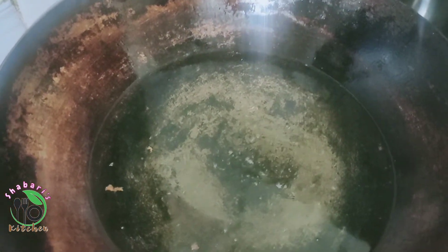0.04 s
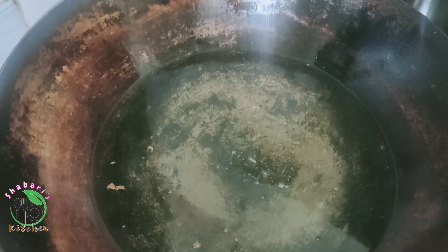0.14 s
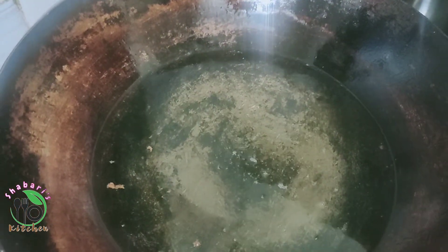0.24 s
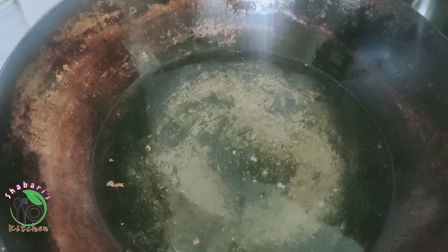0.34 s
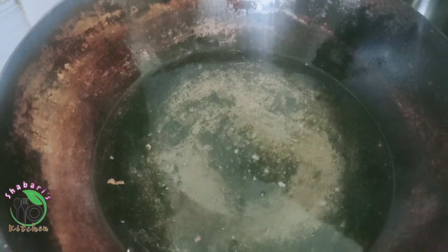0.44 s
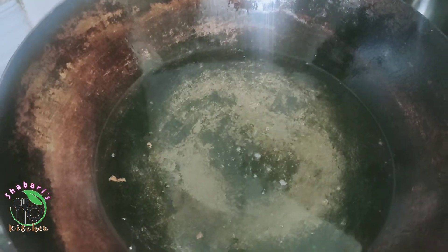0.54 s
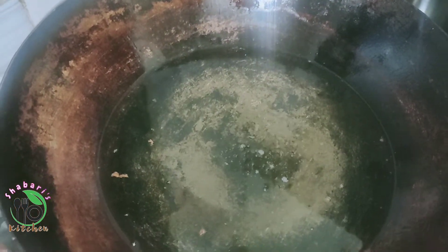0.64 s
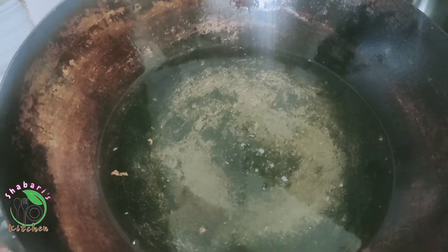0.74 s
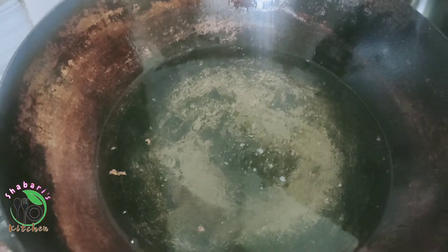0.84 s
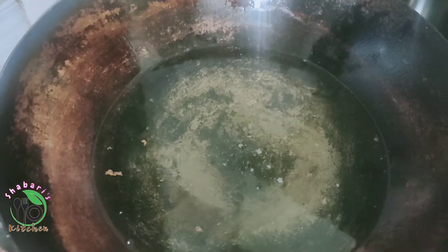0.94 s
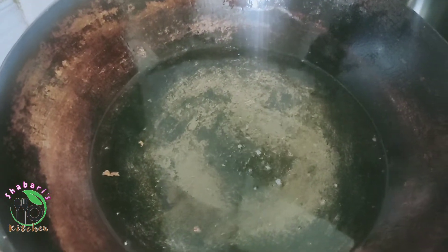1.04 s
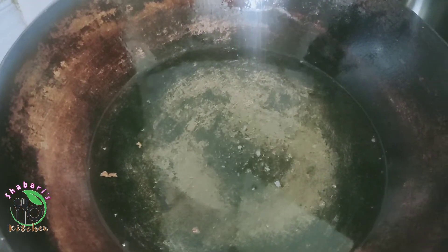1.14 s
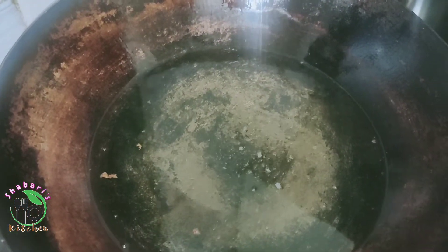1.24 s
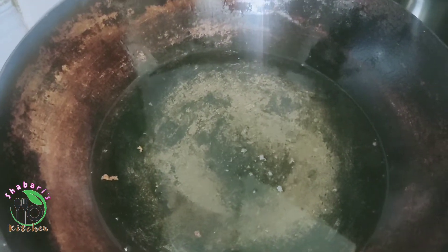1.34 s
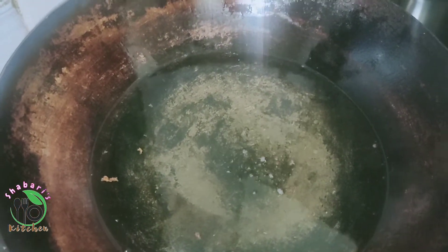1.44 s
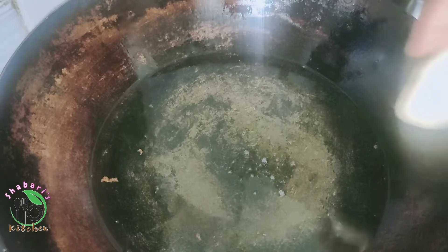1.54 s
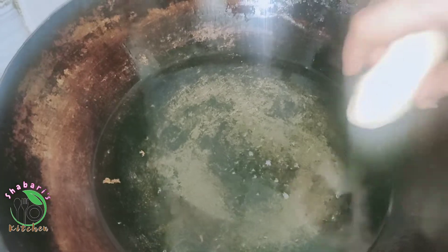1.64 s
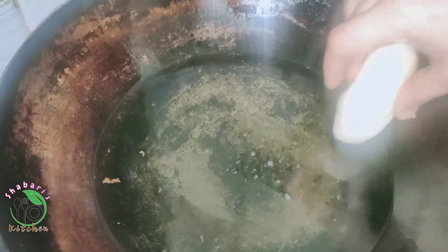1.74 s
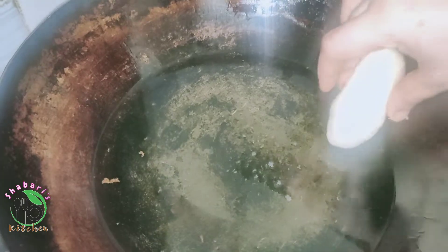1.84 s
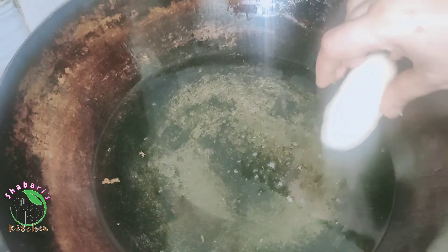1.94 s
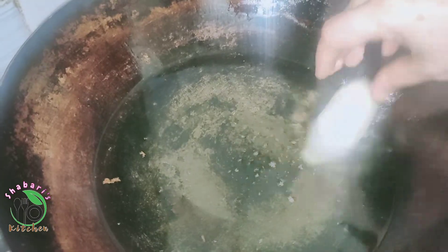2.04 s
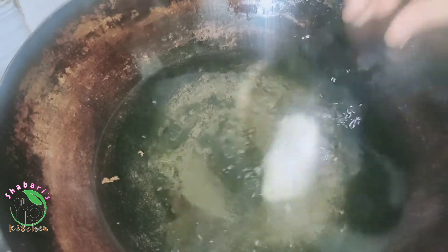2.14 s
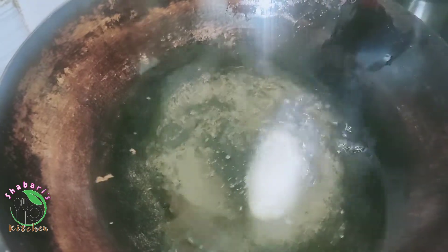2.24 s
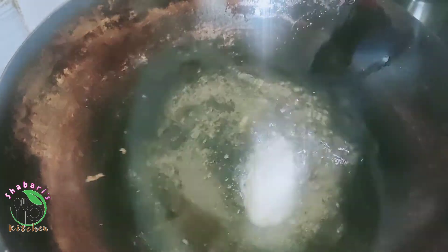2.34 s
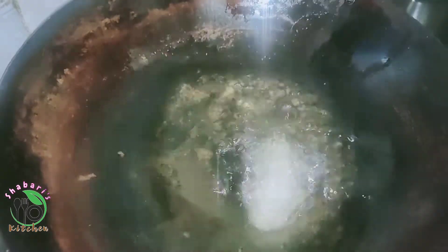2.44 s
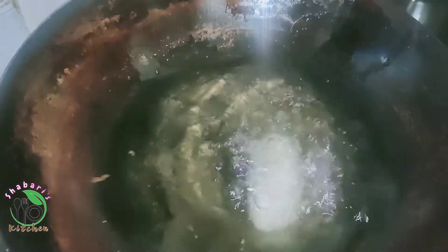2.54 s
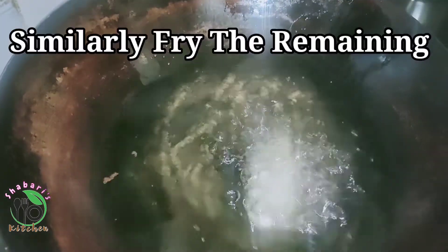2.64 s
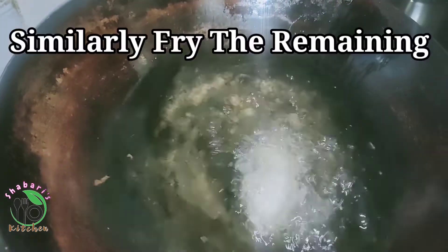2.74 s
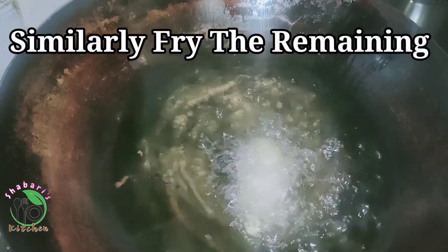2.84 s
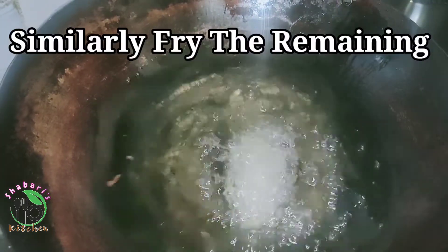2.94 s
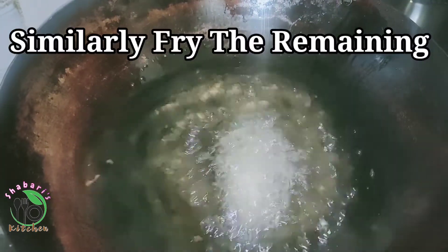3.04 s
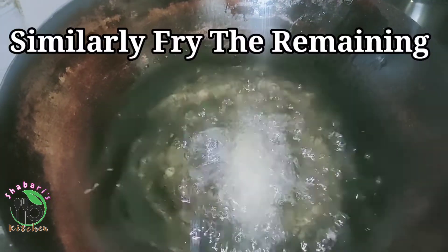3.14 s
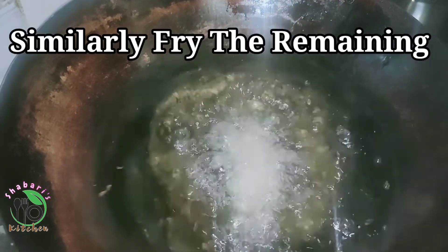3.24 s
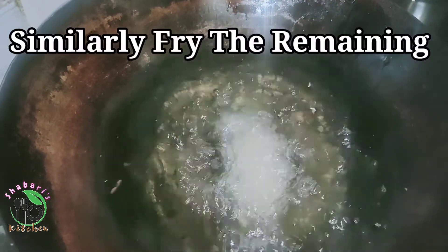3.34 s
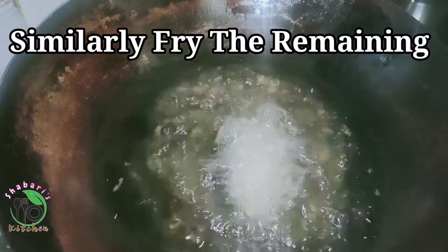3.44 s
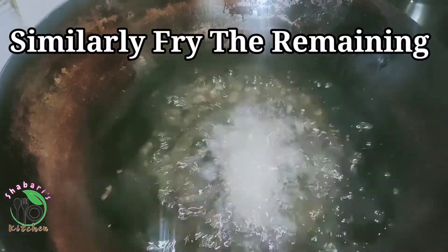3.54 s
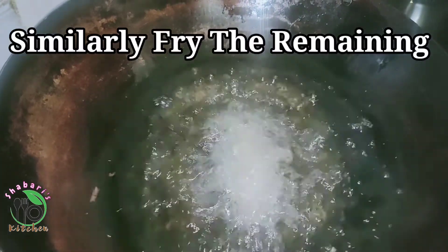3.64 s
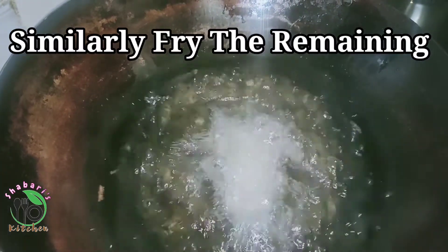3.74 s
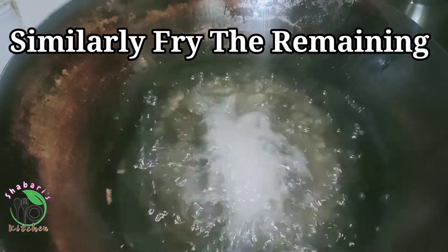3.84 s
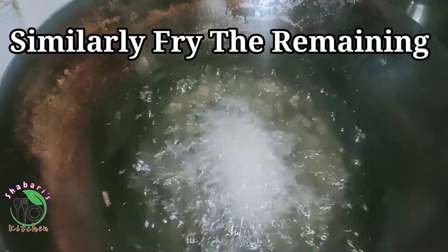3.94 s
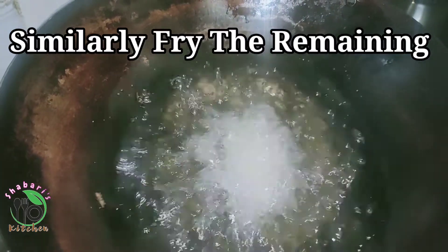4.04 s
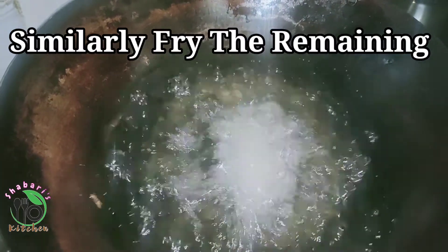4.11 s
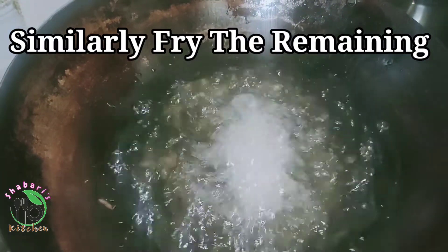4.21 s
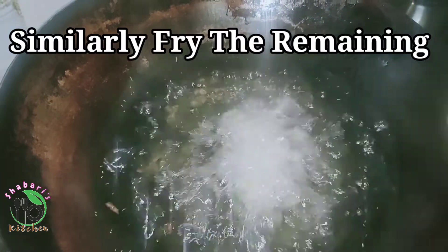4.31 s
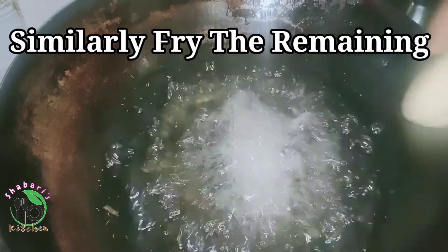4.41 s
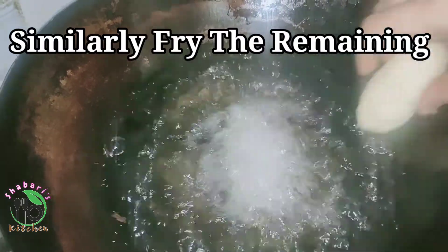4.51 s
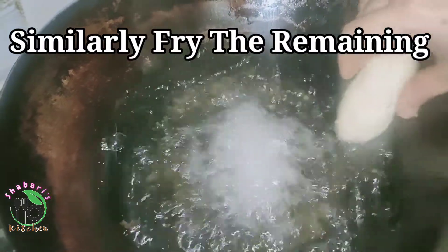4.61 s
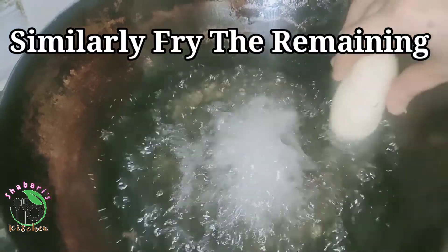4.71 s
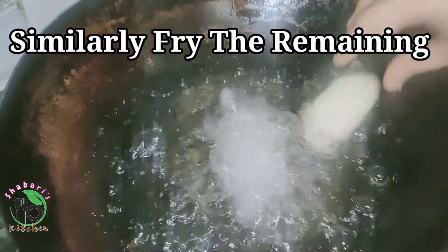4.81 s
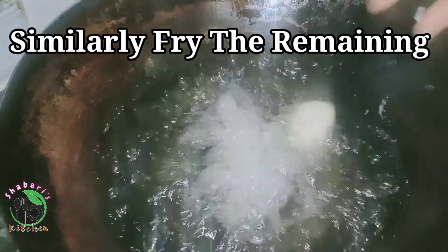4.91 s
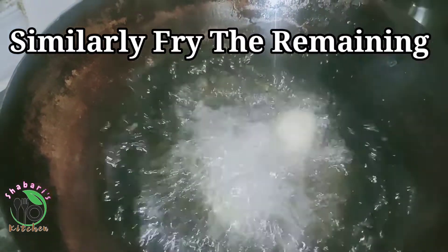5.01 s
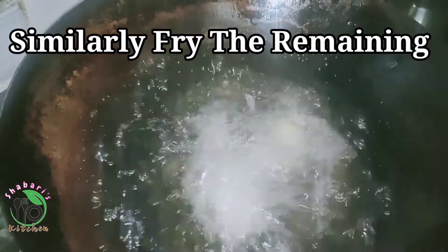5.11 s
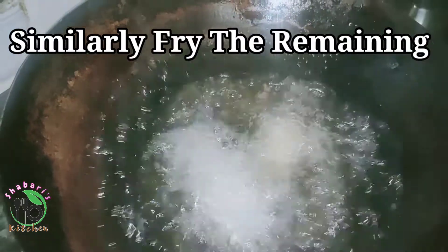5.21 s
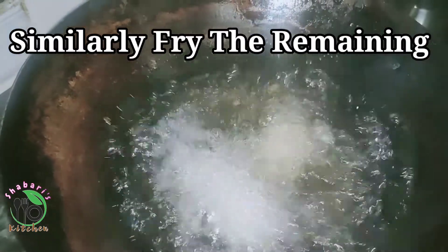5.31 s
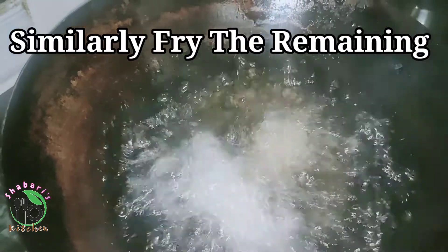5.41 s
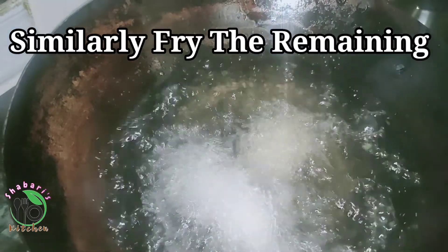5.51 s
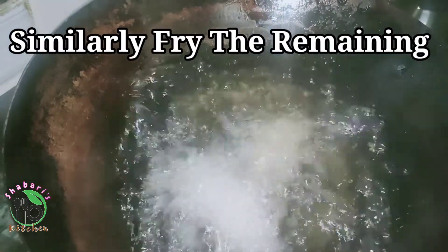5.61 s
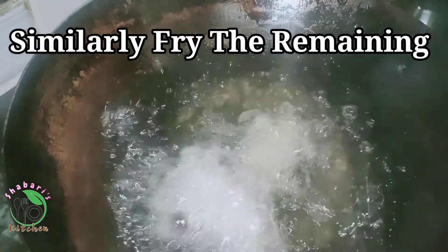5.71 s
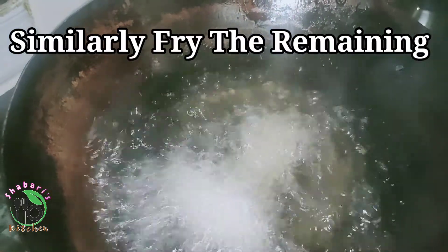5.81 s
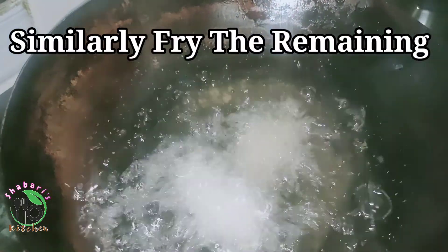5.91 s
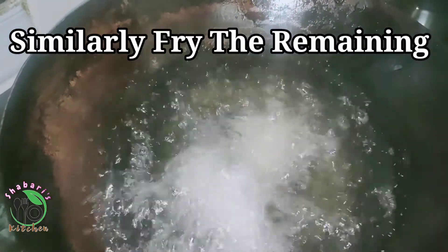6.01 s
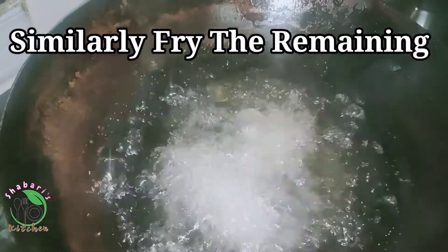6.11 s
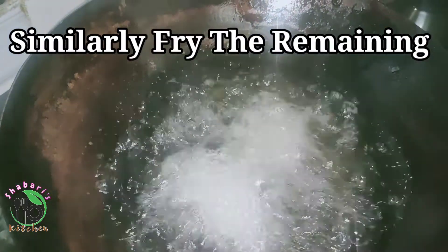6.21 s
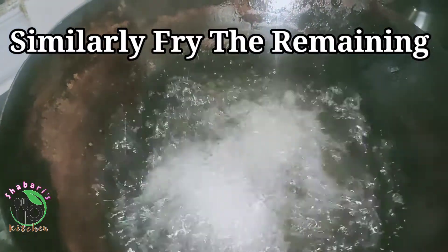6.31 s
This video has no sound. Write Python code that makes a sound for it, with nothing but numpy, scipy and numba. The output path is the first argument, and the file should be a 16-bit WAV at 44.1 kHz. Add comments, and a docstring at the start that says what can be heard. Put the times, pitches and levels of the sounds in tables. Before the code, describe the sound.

In a small hard kitchen, metal ware rattles and is knocked down with a ringing boom, followed by faint oil hiss and a quiet pause. At about three seconds wet food enters hot oil: a bright fizz flares, then gurgling bubbles, crackle, sharp spits and low plops build into a dense boil. Close stereo microphone above the pan, slightly dull on top.

```python
"""A small hard kitchen, heard from just above a pan of hot oil.
Metal ware is knocked and set down as decaying modes and rattle, while the oil hisses faintly with tiny bubbles.
Then wet food slides in: swarms of ringing steam bubbles gurgle, crackle and fizz, single ones stand out as
low plops and higher pips, and drops of water spit with short cracks. A second piece of food adds to the boil.
Dense decaying noise gives the reflections of the pan and the room."""
import sys
import numpy as np
from scipy import signal
from scipy.fft import rfft, irfft, next_fast_len
from scipy.io import wavfile
from numba import njit

SR = 44100
rng = np.random.default_rng(int(sys.argv[2]) if len(sys.argv) > 2 else 0)


def output_pcm(signal):
    """Save a mono or channel-first signal as 16-bit PCM at the path in sys.argv[1].

    Samples are clipped to [-1, 1] before scaling.
    """
    pcm = np.clip(np.atleast_2d(signal).T, -1, 1) * 32767
    wavfile.write(sys.argv[1], SR, np.round(pcm).astype(np.int16))


N = 280476
T = np.arange(N) / SR
DROP_S = 2.946  # the food slides in
ROOM_T60_S = 0.47


def frying():
    """Boiling: water in the food turns to steam, whose bubbles ring at pitches set by their size."""
    # gushes of steam: (time [s], lift of the gurgle [dB], lift of the crackle [dB])
    surges = [(3.17, 4.5, -0.5), (3.27, 0.5, 4.5), (3.49, 3, 6.5), (3.66, 2, 4.5), (4.002, 6, 3.5),
              (4.17, 1.5, 2), (4.33, 5.5, 1.5), (4.61, 2.5, 2), (4.689, 2.5, 4.5), (4.86, 2.5, -1.5),
              (5.009, 2, 2)]
    attack_s, surge_half_length_s, swell_s = 0.0083, 0.034, 0.17
    age = np.maximum(T - DROP_S, 0)
    boil = 1 - np.exp(-(age / attack_s) ** 2)
    # round and deep bubbles take longer to form
    formed = 1 - np.exp(-(age / swell_s) ** 2)
    surge_db, crackle_surge_db = sum(
        np.outer(lifts, np.exp(-((T - s) / surge_half_length_s) ** 2)) for s, *lifts in surges)
    burst_db = 0.73 * walk(55)
    return (gurgle(age, boil, surge_db + burst_db)
            + crackle(age, boil, crackle_surge_db + 0.5 * burst_db)
            + fizz(age, boil)
            + deep_bubbles(boil * formed, 0.5 * burst_db)
            + bloops(age, formed)
            + pings(age, boil))


def gurgle(age, boil, lift_db):
    """Bubble resonance: large steam bubbles ring low, and the lowest pitches fill in last."""
    # colour: (frequency [Hz], level [dB])
    spectrum = [(150, -44.5), (260, -25.5), (297, -6), (339, -19), (410, -4), (465, 1.5), (541, 3),
                (613, -4), (724, -7), (813, -1.5), (876, -4.5), (1250, -7), (1640, -19), (1900, -23),
                (2470, -55), (4180, -120)]
    # the first bubbles are small and grow: (upper edge of the band that fills in [Hz], fill time [s])
    fill = [(800, 0.038), (500, 0.15), (375, 0.25)]
    start_db, growth_db_per_s = -43.5, 3.5
    bubbles = swarm(rate=550, low_hz=322, high_hz=1592, swing=0.82, scatter_db=0.5,
                    pan_db=0.6, spread_db=1.5, wall_db=-9.5)
    bubbles = in_kitchen(bubbles, spectrum, room_db=-2.0)
    # long waves reach both microphones nearly alike
    bubbles = bubbles - 0.67 * below(bubbles - bubbles.mean(0), 800)
    for hz, fill_s in fill:
        bubbles = bubbles - np.exp(-(age / fill_s) ** 2) * below(bubbles, hz)
    return boil * undb(start_db + growth_db_per_s * age + lift_db) * bubbles


def crackle(age, boil, lift_db):
    """Bubble resonance at small size: short higher rings, with a surge as the wet skin first touches the oil."""
    # colour: (frequency [Hz], level [dB])
    spectrum = [(880, -13.5), (1500, -1), (1720, -9), (2090, -2.5), (2540, -8.5), (2880, -3.5), (3460, -8),
                (4500, -8), (5850, -29), (9900, -120)]
    start_db, growth_db_per_s = -55, 3.5
    contact_db, contact_rise_s, contact_t60_s = -45, 0.05, 0.14
    bubbles = swarm(rate=1500, low_hz=1634, high_hz=3960, swing=0.7, scatter_db=4.5,
                    pan_db=5.0, spread_db=2.5, wall_db=-1.0)
    boiling = boil * undb(start_db + growth_db_per_s * age + lift_db)
    contact = undb(contact_db) * flare(DROP_S, contact_rise_s, contact_t60_s)
    # unrelated sounds add in power
    return np.hypot(boiling, contact) * in_kitchen(bubbles, spectrum, room_db=-14.0)


def fizz(age, boil):
    """Flash boiling: surface water turns to the finest, highest bubbles, in flares that die away."""
    # colour: (frequency [Hz], level [dB])
    spectrum = [(2240, 7.5), (3800, -0.5), (5110, 3.5), (6400, -2), (7360, -5.5), (7500, -1.5), (7890, -26),
                (8400, -46.5), (10900, -82), (18500, -120)]
    # flashes of surface water: (start [s], level [dB], t60 [s])
    flashes = [(2.93, -33, 1.9), (3.83, -44, 2.5), (5.717, -36.5, 2.2)]
    start_db, growth_db_per_s, flare_rise_s = -50, -0.2, 0.048
    flares = np.sqrt(sum((undb(db) * flare(s, flare_rise_s, t60)) ** 2 for s, db, t60 in flashes))
    gain = np.hypot(boil * undb(start_db + growth_db_per_s * age), flares)
    bubbles = swarm(rate=2000, low_hz=3590, high_hz=7820, swing=2.14, scatter_db=3.5,
                    pan_db=3.0, spread_db=6.0, wall_db=1)
    bubbles = in_kitchen(bubbles, spectrum, room_db=-22.5)
    # a fierce fizz is made of finer bubbles, so it is brighter
    fierce = np.clip((20 * np.log10(gain + 1e-9) + 48) / 7, 0, 1)
    bright = colour(bubbles, [(4600, -6.5), (7000, 2.0)])
    return gain * ((1 - fierce) * bubbles + fierce * bright)


def deep_bubbles(onset, burst_db):
    """Bubble resonance at the largest size: the lowest rings, coming in heaves."""
    # colour: (frequency [Hz], level [dB])
    spectrum = [(21, -82), (35, -35.5), (89, -12), (118, -18), (152, -6.5), (211, -5), (252, -19.5),
                (296, -2), (334, -11.5), (380, -2.5), (490, -33.5), (840, -120)]
    # level of the deep bubbles, heaving up and down: (time [s], level before the overall lift [dB])
    heaves = [(2.95, -87), (3.09, -62), (3.33, -88), (3.68, -59), (3.82, -93), (4.01, -52), (4.06, -66.5),
              (4.45, -57.5), (4.5, -50), (4.53, -53.5), (4.75, -55.5), (5.25, -53), (5.51, -58.5),
              (5.54, -51), (6.08, -54.5), (6.35, -54.5)]
    lift_db = 3
    bubbles = swarm(rate=200, low_hz=83.0, high_hz=359.5, swing=0.79, scatter_db=-3.0,
                    pan_db=0.0, spread_db=2.5, wall_db=-32.5)
    gain = onset * undb(lift_db + np.interp(T, *np.transpose(heaves)) + burst_db)
    return gain * in_kitchen(bubbles, spectrum, room_db=-12)


def bloops(age, formed):
    """Rising resonance: round, low bubbles chirp upwards as they die away."""
    start_db, growth_db_per_s = -47, -2
    bubbles = swarm(rate=30, low_hz=407, high_hz=571, swing=1.63, scatter_db=-2.0,
                    pan_db=-6.0, spread_db=2.5, wall_db=-12.5, glide=0.03)
    round_bubbles = unit(colour(bubbles, [(200, -20.5), (420, -6)]))
    return formed * undb(start_db + growth_db_per_s * age) * round_bubbles


def pings(age, boil):
    """Lightly damped resonance: while the oil is still open, single bubbles ring out above the boil."""
    start_db, growth_db_per_s = -48, -6.5
    bubbles = swarm(rate=85, low_hz=1307, high_hz=3940, swing=2.6, scatter_db=5.5,
                    pan_db=3.0, spread_db=4.5, wall_db=-3.0, glide=0.015)
    return boil * undb(start_db + growth_db_per_s * age) * unit(bubbles)


def plops():
    """Surface rupture: single bubbles, large and small, ring as low plops and higher pips and break with a snap."""
    # bubbles that stand out: (time of peak [s], relative level [dB], pitch [Hz], cycles to the peak [1])
    bubbles = [(3.167, -28.5, 507.4, 2.4), (3.231, -36, 3160, 5), (3.246, -34, 2290, 6.6),
               (3.2976, -27, 866, 1.01), (3.423, -43, 2270, 5), (3.469, -33.5, 1860, 3),
               (3.485, -26, 3270, 0.87), (3.5134, -29, 1014, 0.44), (3.579, -34.5, 3900, 8.4),
               (3.623, -18, 1053, 0.78), (3.628, -31, 1320, 2.4), (3.6444, -22.5, 780, 0.9),
               (3.6858, -25, 720, 0.68), (3.693, -37.5, 2440, 5), (3.863, -24, 3360, 0.62),
               (3.973, -24.5, 2650, 0.85), (3.981, -21.5, 770, 0.7), (4.18, -21, 1120, 0.72),
               (4.18, -20.5, 2020, 0.86), (4.3141, -26.5, 805, 0.73), (4.3249, -27, 770, .8),
               (4.381, -24, 816, 0.8), (4.3925, -23, 850, 1.1), (4.4853, -23.5, 2930, 1.6),
               (4.5355, -28.5, 2840, 1.4), (4.559, -29.5, 2230, 2.2), (4.618, -22.5, 720, 0.79),
               (4.6931, -30, 740, 0.72), (4.7494, -29.5, 2430, 1.6), (4.814, -35, 2180, 2.8),
               (4.8434, -23, 735, 0.72), (4.8519, -24.5, 700, 0.75), (4.9919, -20, 1120, 0.43),
               (5.0216, -18.5, 840, 0.61), (5.0817, -23, 633, 1.06), (5.1208, -29, 2480, 2),
               (5.1642, -18, 770, 0.85), (5.2261, -16, 833, 0.78), (5.2665, -20, 890, 0.4),
               (5.2801, -18.5, 960, 0.66), (5.3555, -19, 920, 0.56), (5.443, -25, 2100, 0.87),
               (5.457, -22.5, 598, 1.7), (5.5372, -14, 610, 0.63), (5.5608, -22, 674, 0.78),
               (5.7254, -23, 680, 0.6), (5.7816, -25, 615, 0.87), (5.8492, -17, 770, 0.44),
               (5.9386, -16, 620, 0.65), (5.937, -23.5, 2860, 0.66), (6.0499, -14, 775, 0.69),
               (6.085, -20.5, 774, 0.76), (6.1233, -22.5, 850, 0.8), (6.2047, -14.5, 1030, 0.39),
               (6.224, -19.5, 800, 0.86), (6.2854, -15.5, 760, 0.6), (6.322, -16.5, 720, 0.9)]
    snap_hz, snap_db = 2500, -14.5
    s, db, hz, swing = np.transpose(bubbles)
    body = colour(ring(s, hz, swing, undb(db + 2.0), 0.011), [(40, -17.5), (300, -3.0)])
    snap = ring(s, np.full(len(s), snap_hz), np.full(len(s), 0.5), undb(db + snap_db), 0.011)
    x = body + snap
    pan_wall = undb(-11) * echoes(x, t60=0.06)
    return sides(0.8)[:, None] * (x + pan_wall + undb(-6) * echoes(x, ROOM_T60_S))


def spits():
    """Explosive boiling: water drops burst with a short crack and a lower snap that light up the room."""
    # bursting drops: (time [s], relative level [dB], pitch [Hz], left minus right [dB])
    drops = [(1.07, -39, 7250, -27), (1.087, -37, 7140, -20), (1.094, -39, 7200, -17),
             (1.209, -41.5, 7000, -15), (2.058, -38, 7100, -18), (2.2783, -36, 7000, -10),
             (2.6506, -45, 6030, -21), (2.8078, -38.5, 6760, -13.5), (2.973, -30.5, 5900, 4),
             (3.0191, -19.5, 6300, -3), (3.0436, -20.5, 6700, 1), (3.069, -23, 4540, 22),
             (3.1012, -24, 6750, -10), (3.19, -23.5, 5500, 8), (3.2334, -27, 5550, 13),
             (3.514, -32, 4800, 23), (3.8514, -29, 6600, 3), (3.8628, -23.5, 5600, 9),
             (3.906, -22.5, 5300, 9), (3.971, -19, 5070, 4.5), (4.1125, -29, 5900, -1),
             (4.1373, -28, 5000, 13), (4.1531, -13, 5060, 5.5), (4.2556, -32.5, 5920, 3),
             (4.2903, -28.5, 5900, 2), (4.3754, -34, 6600, -7), (4.497, -10.5, 6660, -3.5),
             (4.5934, -22, 6470, -10), (4.8475, -31.5, 4380, 16), (4.9492, -33.5, 7100, -13),
             (5.7452, -25, 7000, 12), (5.7649, -15, 6800, 4), (5.8455, -19.5, 6420, 7),
             (6.0047, -26.5, 4530, 19)]
    splutter_fade_s, splutter_db = 0.55, 0.5
    s, db, hz, pan_db = np.transpose(drops)
    # just after the food goes in, drops burst in clusters
    wet = (s > DROP_S) * np.exp(-((s - DROP_S) / splutter_fade_s) ** 2)
    gains = sides(pan_db)
    size = undb(db + 4.5) * gains / gains.mean(0)
    swing = np.full(len(s), 1.2)
    crack = np.array([ring(s, hz, swing, (1 - wet / 2) * v, 0.0015) for v in size])
    splutter = np.array([ring(s, hz, swing, wet * v, 0.0015) for v in size])
    snap = ring(s, hz / 2.4, np.full(len(s), 0.25), undb(db - 15.5), 0.003)
    x = crack + undb(splutter_db) * echoes(splutter, t60=0.024) + snap
    # small drops make a larger share of splash, which is heard only off the walls
    splash = ring(s, hz / 1.57, np.full(len(s), 0.35), undb(0.33 * db - 19.5), 0.003)
    return x + undb(-4.5) * echoes(x, t60=0.048) + undb(-7.5) * echoes(x + splash, t60=0.38)


def thumps():
    """Damped low modes: the settling food and the biggest burst of steam thump the pan."""
    # dull thumps: (time [s], pitch [Hz], level before colouring [dB], t60 [s], left minus right [dB])
    events = [(3.06, 151, -53, 0.24, -3), (4.4976, 145, -16, 0.0093, -23), (4.595, 95, -39.5, 0.37, -9)]
    out = np.zeros((2, N))
    for s, hz, db, t60, pan_db in events:
        x = undb(db) * np.sin(2 * np.pi * hz * T) * fade(t60, T)
        x = colour(x, [(30, -25), (130, -5.5)])
        add(out, s, (x + undb(-12.0) * echoes(x, ROOM_T60_S)) * sides(pan_db)[:, None])
    return out


def knocks():
    """Impact excitation: knocked metal ware gives short rattles, a dull boom and ringing modes."""
    # blows, the first row being the dying tail of an earlier knock:
    # (time [s], level [dB], relative body [dB], relative metal ring [dB], rattle's room tail [dB])
    events = [(0.0, -50, -10, -40, -4), (0.0105, -39.5, -26, -34, -10.5), (0.022, -31.5, -22, -34, -13),
              (0.088, -46, -26, -42, -9), (0.114, -38.5, -4, -40, -15), (0.125, -33.5, -9, -44, -19),
              (0.204, -47, -14, -38, -27), (0.7013, -36.5, 0.5, 4.5, -0.5), (0.8205, -30, 6.5, -16, -8),
              (0.833, -36, 9, -22, -8)]
    # colour of the rattle: (frequency [Hz], level [dB])
    rattle_colour = [(35, -74), (60, -29.5), (220, -15.5), (474, -2.5), (864, -4), (1020, -3),
                     (1640, -13.5), (2640, -13.5), (2990, -14.5), (3380, -14.5), (4710, -16.5), (6420, -16),
                     (7270, -9.5), (7730, -23.5), (8400, -18), (10900, -86.5), (18500, -120)]
    # a tiny tink: (frequency [Hz], level before the room [dB])
    tink_s, tink = 0.35, [(5150, -75), (5790, -75.5)]
    out, t = np.zeros((2, N)), T[:int(0.7 * SR)]
    metal, boom = metal_ring(t), surface_boom(t)
    for s, db, body_db, ring_db, room_db in events:
        rattle = rng.standard_normal((2, len(t)))
        # long waves reach both microphones alike
        rattle[0] += below(rattle[1] - rattle[0], 520)
        rattle = colour(unit(colour(rattle, rattle_colour)), [(450, body_db), (1000, 0.0092)])
        # the top of the rattle lingers longer than the rest
        dull = below(rattle, 6000)
        tail = dull * fade(ROOM_T60_S, t) + (rattle - dull) * fade(0.57, t)
        direct = rattle * (undb(-0.5) * fade(0.0062, t) + undb(-4.5) * fade(0.056, t))
        rattle = direct + undb(room_db) * tail
        ringing = undb(ring_db - 9.5) * metal
        onset = 1 - np.exp(-t / 0.00071)
        add(out, s, undb(db) * (rattle + ringing + undb(body_db - 6.5) * boom) * onset)
    partials = sum(undb(db) * np.sin(2 * np.pi * hz * t) for hz, db in tink)
    add(out, tink_s, partials * fade(0.28, t))
    return ports(out + undb(-9.5) * echoes(out, t60=0.23))


def metal_ring(t):
    """Modal vibration: beating modes of the metal over a thicket of weak partials."""
    # modes: (frequency [Hz], relative level [dB], t60 [s])
    modes = [(371, -1, 0.6), (492, -8, 0.7), (650, -2, .4), (748, -4, .7), (920, 0, .35), (1001, 6, 0.5),
             (1050, 2, .35), (1776, 0, 0.27), (2945, 1.5, 0.7), (2972, -2, .35), (3612, -9, 0.45),
             (4097, -8, 0.85), (4608, -4.5, 0.55), (4829, 0, 0.33), (7580, -2, 0.25)]
    shimmer_db = 0.5
    strong = sum(undb(db) * mode(hz, t60, t) for hz, db, t60 in modes)
    return strong + undb(shimmer_db) * shimmer(t, low_hz=1198, high_hz=7740, t60=0.6)


def surface_boom(t):
    """Modal vibration: the hollow surface the ware lands on booms at low pitches."""
    # modes: (frequency [Hz], relative level [dB], t60 [s])
    modes = [(210, -23.5, 0.79), (334, -31, 0.49), (450, -21, .4), (530, -21, 0.4), (620, -25, 0.33)]
    thicket_db = -10.5
    boom = sum(undb(db) * np.sin(2 * np.pi * hz * t) * fade(t60, t) for hz, db, t60 in modes)
    return boom + undb(thicket_db) * shimmer(t, low_hz=398, high_hz=1125, t60=0.63)


def hollow_tones():
    """Narrow-band modulation: slow noise on a gliding carrier makes soft, rough, hollow tones."""
    # glides: (start [s], length [s], first, middle and last frequency [Hz], bandwidth [Hz], relative level [dB])
    glides = [(0.01, 0.091, 452, 410.4, 364, 172, -52), (0.103, 0.066, 274, 192, 150, 110, -60.5),
              (0.977, 0.1, 509, 569, 595, 90, -54.5), (0.926, 0.75, 768.6, 852.6, 981, 205, -58),
              (1.151, 0.23, 1167, 1333, 1325, 150, -60.5), (1.392, 0.47, 489, 545, 540, 148, -63),
              (1.628, 0.1, 436, 374, 290, 90, -60), (1.624, 0.38, 933, 979, 962, 150, -64.5),
              (1.793, .12, 831, 800, 755, 121, -61.5), (2.236, 0.075, 557, 501, 440, 125, -63.5),
              (2.802, 0.083, 1030, 1040, 980, 129, -70.5), (2.84, 0.12, 230, 292, 318, 120, -70)]
    out = np.zeros(N)
    for s, length, *path_hz, width_hz, db in glides:
        t = T[:int(length * SR)]
        lowpass = signal.butter(3, width_hz / 2, fs=SR, output="sos")
        rough = signal.sosfilt(lowpass, rng.standard_normal((2, SR)))[:, -len(t):]
        phase = 2 * np.pi * np.cumsum(np.interp(t, [0, length / 2, length], path_hz)) / SR
        tone = rough[0] * np.sin(phase) + rough[1] * np.cos(phase)
        add(out, s, undb(db) * unit(tone * signal.windows.tukey(len(t), 0.3)))
    return undb(-2.0) * from_right(out) + undb(-4.0) * echoes(out, ROOM_T60_S)


def idle_oil():
    """Boiling of traces: moisture hisses in tiny bubbles and boils off; a drip from the food adds a thin hiss."""
    # oil alone: (time [s], hiss level before the ports [dB])
    level = [(0.9, -56.5), (1.08, -63), (1.42, -58.5), (2.0, -66.5), (2.33, -69.5), (2.631, -72.5)]
    # colour of the hiss: (frequency [Hz], level [dB])
    spectrum = [(300, -41), (700, -23.5), (1400, -26.5), (2200, -13.5), (3000, -18.5), (4500, -12),
                (5400, -9.5), (7230, -1.5), (7630, -10.5), (8400, -29)]
    # colour the drip lends the hiss: (frequency [Hz], level [dB])
    drip_colour = [(1000, -7), (2400, -11), (3800, 0.5), (6500, -2)]
    drip_s, drip_db, drip_t60_s = 2.642, -57.5, 5.7
    # the hiss is thin at first, then fills out below thin_hz
    full_s, full_rise_s, thin_hz = 1.38, 0.13, 3100
    # as it fades below fine_db only the finest bubbles, above fine_hz, are left
    fine_db, fine_range_db, fine_hz = -66, 7.5, 5950
    hiss_db = np.interp(T, *np.transpose(level), left=-140)
    bubbles = swarm(rate=2300, low_hz=613, high_hz=8100, swing=0.85, scatter_db=3.5,
                    pan_db=-4.0, spread_db=10.0, wall_db=-1.5)
    bubbles = in_kitchen(bubbles, spectrum, room_db=-2.5)
    thin = np.clip((full_s - T) / full_rise_s, 0, 1)
    hiss = bubbles - thin * below(bubbles, thin_hz)
    fine = np.clip((fine_db - hiss_db) / fine_range_db, 0, 1)
    hiss = hiss - fine * below(hiss, fine_hz)
    drip = undb(drip_db) * flare(drip_s, rise_s=0.008, t60=drip_t60_s)
    return ports(undb(hiss_db) * hiss + drip * colour(bubbles, drip_colour))


def kitchen():
    """Diffuse background: very quiet, partly shared noise of room air with a thin hum."""
    # colour of the air: (frequency [Hz], level [dB])
    air_colour = [(25, -10), (100, -8.5), (170, -4.5), (260, -23), (450, -8), (650, -17.5), (1200, -25),
                  (2000, -41), (8000, -24)]
    air_db, hum_hz, hum_db = -79.5, 300, -89.0
    noise = rng.standard_normal(N) + 0.35 * rng.standard_normal((2, N))
    air = unit(colour(noise, air_colour))
    hum = np.sin(2 * np.pi * hum_hz * T) * undb(hum_db + 1.8 * walk(1.2))
    return air * undb(air_db + 1.5 * walk(13.0)) + hum


@njit
def ring(when, hz, swing, size, glide):
    """Damped oscillation: a sine swells for `swing` cycles, then dies away while its pitch rises."""
    out = np.zeros(N)
    for k in range(len(when)):
        rise = swing[k] / hz[k]
        start = when[k] - rise
        for i in range(max(int(start * SR) + 1, 0), min(int((start + 10 * rise) * SR), N)):
            u = (i / SR - start) / rise
            envelope = u * np.exp(1 - u)
            out[i] += size[k] * envelope * np.sin(2 * np.pi * swing[k] * u * (1 + glide * u))
    return out


def swarm(rate, low_hz, high_hz, swing, scatter_db, pan_db, spread_db, wall_db, glide=0.013, count=4):
    """Random superposition: `rate` bubbles a second at `count` spots, each with its own pan-wall reflections."""
    out = 0
    for place in np.linspace(-1, 1, count):
        when, pitch, life, big, sign = rng.random((int(rate * N / SR / count), 5)).T
        hz = low_hz + (high_hz - low_hz) * pitch
        swings = swing * 2 ** (2 * life - 1)
        # random sizes and polarities
        size = undb(-scatter_db * np.log(big + 0.0045)) * np.sqrt(hz / swings) * np.sign(sign - 0.5)
        # level and arrival time at the two microphones depend on the spot
        lag_s = 0.00006 * place - 0.00003
        x = np.array([ring(when * N / SR + side * lag_s, hz, swings, size, glide) for side in (0, 1)])
        gains = sides(pan_db + spread_db * place)[:, None]
        out = out + gains * (x + undb(wall_db) * echoes(x, t60=0.053))
    return out


def mode(hz, t60, t):
    """Beating: a partial of uneven metal and a weaker detuned twin, different at each microphone."""
    detune, phase, twin_phase = rng.random((3, 2, 1))
    twin = np.sin(2 * np.pi * ((hz + 70 * (detune - 0.5)) * t + twin_phase))
    return (np.sin(2 * np.pi * (hz * t + phase)) + 0.5 * twin) * fade(t60, t)


def shimmer(t, low_hz, high_hz, t60, count=90):
    """Modal density: many weak partials, each with its own strength at either microphone."""
    pitch, life, *phases = rng.random((count, 4, 1)).transpose(1, 0, 2)
    hz = low_hz + (high_hz - low_hz) * pitch
    partials = np.sin(2 * np.pi * (hz * t + np.array(phases))) * fade(t60 * (0.5 + life), t)
    return (rng.standard_normal((2, count, 1)) * partials).sum(1) / np.sqrt(count)


def in_kitchen(x, spectrum, room_db):
    """Reverberation and filtering: the kitchen lingers, the pan colours; the middle is scaled to rms 1."""
    x = colour(x + undb(room_db) * echoes(x, ROOM_T60_S), spectrum)
    return x / np.std(x.mean(0))


def echoes(x, t60):
    """Diffuse reverberation: convolution with decaying noise of about unit energy, unrelated left and right."""
    t = T[:SR]
    tail = rng.standard_normal((2, SR)) * fade(t60, t) * (1 - np.exp(-t / 0.0011))
    tail = unit(tail)[:, t < 1.5 * t60] / np.sqrt(SR)
    return signal.oaconvolve(np.atleast_2d(x), tail, axes=1)[:, :N]


def ports(x):
    """Directional filtering: the two microphone ports colour diffuse sound differently."""
    # diffuse sound: (frequency [Hz], left minus right [dB])
    difference = [(100, -1), (200, 5.5), (310, 8.5), (540, -2), (1600, 0.5), (2800, 4), (5000, 5.5),
                  (6200, 11.5), (7300, -12)]
    return np.array([colour(v, [(hz, sign * db / 2) for hz, db in difference])
                     for v, sign in zip(x, (1, -1))])


def from_right(x):
    """Time-difference stereo: one sound at both microphones, later on the left."""
    lag_s = 0.00025
    return np.array([np.interp(T - lag_s, T, x), x])


def sides(pan_db):
    """Level-difference stereo: left and right gains for left minus right in dB."""
    return undb(np.array([pan_db, -pan_db]) / 2)


def colour(x, points):
    """Minimum-phase filtering: folding the cepstrum gives a causal filter through (Hz, dB) points."""
    hz, db = np.transpose(points)
    size = next_fast_len(x.shape[-1] + SR // 10)
    f = np.maximum(np.fft.rfftfreq(size, 1 / SR), 1)
    gain = undb(np.interp(np.log(f), np.log(hz), db))
    cepstrum = irfft(np.log(gain), size)
    cepstrum[1:size // 2] *= 2
    cepstrum[size // 2 + 1:] = 0
    return irfft(rfft(x, size) * np.exp(rfft(cepstrum)), size)[..., :x.shape[-1]]


def below(x, hz):
    """Zero-phase filtering: the part of x under a frequency, without delay."""
    return signal.sosfiltfilt(signal.butter(6, hz, fs=SR, output="sos"), x)


def fade(t60, t):
    """Exponential decay: 60 dB in t60 seconds."""
    return np.exp(-np.log(1000) * t / t60)


def flare(s, rise_s, t60):
    """Attack and exponential decay: swells from time s to 1, then dies away."""
    return np.clip((T - s) / rise_s, 0, 1) ** 2 * fade(t60, np.maximum(T - s - rise_s, 0))


def walk(rate):
    """Random modulation: normal draws, `rate` a second, joined by straight lines."""
    return np.interp(T * rate, np.arange(N // 10), rng.standard_normal(N // 10))


def undb(db):
    """Logarithmic level: decibels to amplitude gain."""
    return 10 ** (np.asarray(db) / 20)


def unit(x):
    """Energy normalisation: scale to rms 1."""
    return x / np.sqrt(np.mean(x ** 2))


def add(out, s, x):
    """Linear superposition: mix x in at time s."""
    i = int(s * SR)
    out[..., i:i + x.shape[-1]] += x[..., :N - i]


def scene():
    """Linear superposition of all sources at the two microphones."""
    return frying() + plops() + spits() + thumps() + knocks() + hollow_tones() + idle_oil() + kitchen()


def record(dry):
    """Band limiting: the recorder's elliptic low-pass cuts the top steeply."""
    top_hz = 7750
    return signal.sosfilt(signal.ellip(8, 0.3, 65, top_hz, fs=SR, output="sos"), dry)


dry = scene()
out = record(dry)
output_pcm(out)
```